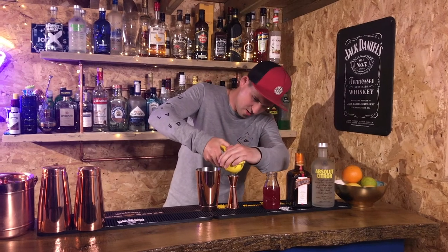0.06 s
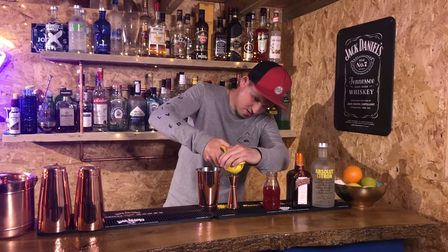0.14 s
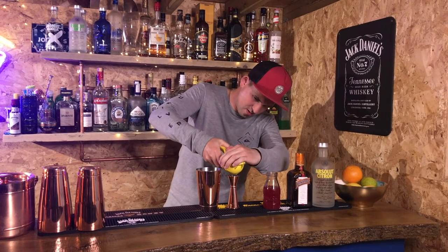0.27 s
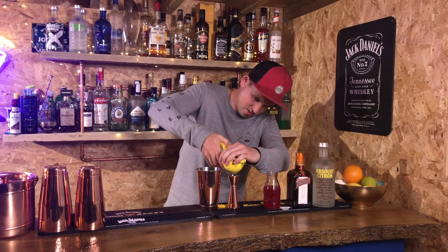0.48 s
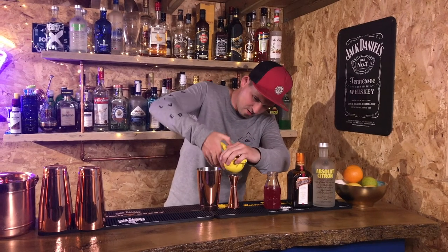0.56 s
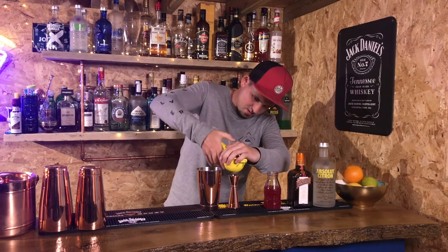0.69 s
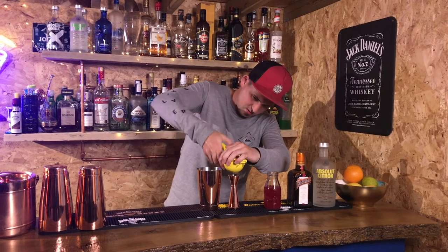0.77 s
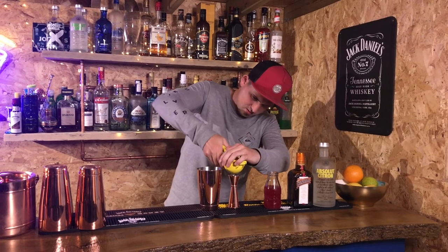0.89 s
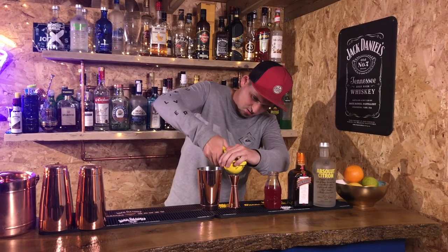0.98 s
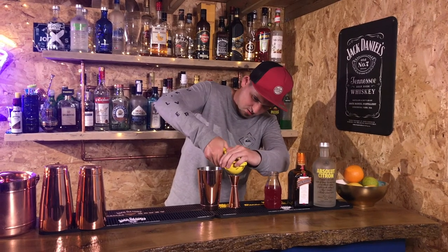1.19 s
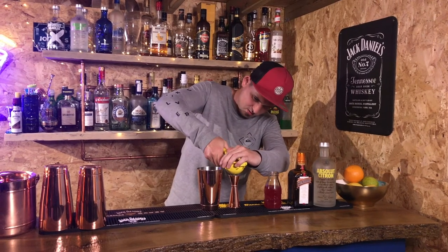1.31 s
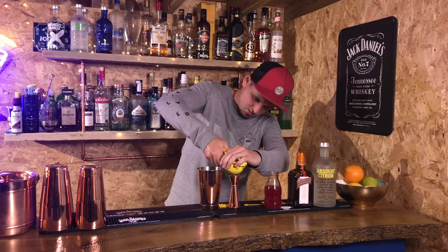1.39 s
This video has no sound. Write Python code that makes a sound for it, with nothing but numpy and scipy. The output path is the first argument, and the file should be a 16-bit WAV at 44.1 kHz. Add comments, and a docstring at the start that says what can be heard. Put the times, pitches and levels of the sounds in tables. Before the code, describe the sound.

A hand citrus press squeezes juice into a metal cup in a small wooden bar. A faint trickle and fizz open; a crisp metallic click cluster comes at 0.21 s, then light drips and a wet spit near 0.37. Sound cuts out from 0.59 to 0.76. Plops and crackling squelches return, with stronger trickling from 1.04, the loudest drop near 1.21, and a dull faint click at 1.43. Low rumble, hum and hiss lie beneath.

```python
"""A hand-held citrus press in a small wooden bar: its metal halves click as cracks of noise over ringing modes.
The rind spits and squelches in puffs of crackling band noise over a fizz. Juice trickles into a metal cup as
random splashes that sound its air column, and drips as damped tones creeping upward. A fridge-like rumble
with a low hum and microphone hiss lies below; the level dips briefly, then the sound is muted for a moment."""
import sys
import numpy as np
from scipy import signal
from scipy.fft import rfft, irfft, next_fast_len
from scipy.io import wavfile
from scipy.ndimage import uniform_filter1d

SR = 44100
rng = np.random.default_rng(int(sys.argv[2]) if len(sys.argv) > 2 else 0)


def wav_out(sig):
    """Save sig, one row per channel (or a flat mono array), as 16-bit PCM at SR to the path in sys.argv[1]."""
    wavfile.write(sys.argv[1], SR, np.round(np.clip(np.atleast_2d(sig).T, -1, 1) * 32767).astype(np.int16))


def invert_db(level):
    """Linear amplitude ratio for a level in decibels (20 dB per decade), elementwise."""
    return 10 ** (np.asarray(level, dtype=float) / 20)


N = 63945
T = np.arange(N) / SR
TOP_HZ = 15750  # highest bubble pitch, and the band limit of the whole mix
FIRST_WALL_S = 0.008  # delay before the room answers


def unit(x):
    """Scale to rms 1."""
    return x / np.sqrt(np.mean(x ** 2) + 1e-20)


def along(points, hz):
    """Read a curve of (Hz, value) points on a log frequency axis."""
    f, value = np.transpose(points)
    return np.interp(np.log(hz + 1), np.log(f + 1), value)


def filtered(x, response):
    """Filter x by a complex response of frequency."""
    size = next_fast_len(len(x) + 8192)
    spectrum = rfft(x, size) * response(np.fft.rfftfreq(size, 1 / SR))
    return irfft(spectrum, size)[:len(x)]


def add(out, start_s, x):
    """Mix x into out from a start time, cutting what runs past the end."""
    part = out[round(start_s * SR):][:len(x)]
    part += x[:len(part)]


RING_WANDER = 0.069  # random walk of a mode's phase [radians a sample]
# Modes the metal press rings with: (frequency [Hz], level [dB], t60 [s])
PRESS_MODES = [(678, -11.5, 0.017), (1170, -23, 0.05), (1192, -3.5, 0.0099), (1350, -5.5, 0.011),
               (2007, -12, 0.035), (2955, -19.5, .02), (3510, -15.5, 0.034), (4076, -6, 0.02),
               (4354, -5.5, 0.022), (4500, -15.5, 0.07), (4560, -19, 0.13), (4633, -17.5, 0.08),
               (4750, -16.5, 0.055), (6630, -16.5, 0.011), (8730, -10, 0.0096)]


def press_ring(t, bright_db):
    """Metal modes die away, each with a wandering phase; brightness lifts those over 3 kHz."""
    ring = np.zeros(len(t))
    for hz, db, t60 in PRESS_MODES:
        level = invert_db(db + bright_db * (hz > 3000) - 60 * t / t60)
        wander = RING_WANDER * np.cumsum(rng.standard_normal(len(t)))
        ring += level * np.sin(2 * np.pi * hz * t + wander)
    return ring


CRACK_DB, CRACK_T60_S, CRACK_TURN_HZ = -0.5, 0.015, 8000  # contact noise against the ring
CLICK_DB, WET_CLICK_DB = -7, -6.5  # trim of all clicks; room tail against the click
LOWEST_HZ = 924  # the small body radiates little below this
# Contacts of the press halves: (time [s], level before the trim [dB], brightness [dB])
CLICKS = [(.2076, -16.5, 1.5), (0.2088, -18.5, 2.5), (0.2122, -23.5, 5.5), (0.2152, -31.5, 9),
          (1.4271, -29, -15), (1.429, -26, -12.5)]


def press():
    """Each contact cracks, rings the press's modes and wakes the room; the small body radiates little bass."""
    out, t = np.zeros(N), T[:SR // 4]
    for start_s, db, bright_db in CLICKS:
        ring = press_ring(t, bright_db)
        noise = filtered(rng.standard_normal(len(t)),
                         lambda f: f / CRACK_TURN_HZ / (1 + (f / CRACK_TURN_HZ) ** 4))
        # brightness counts double in the crack
        crack = noise * invert_db(CRACK_DB + 2 * bright_db - 60 * t / CRACK_T60_S)
        onset = 1 - np.exp(-t / 0.0003)
        hit = invert_db(db + CLICK_DB) * (ring + crack) * onset
        add(out, start_s, hit)
        add(out, start_s + FIRST_WALL_S, invert_db(WET_CLICK_DB) * signal.fftconvolve(hit, tail()))
    return signal.sosfilt(signal.butter(6, LOWEST_HZ, "high", fs=SR, output="sos"), out)


GRAIN_DB, GRAIN_S = 4.5, 0.001  # how unevenly the hiss jumps, and how long a jump is smoothed
# Tiny bubbles: density, cycles until the envelope term exp(-2 cycle / this) has lost two e-folds,
# spread of strength, level over the hiss
BUBBLES_PER_S, BUBBLE_CYCLES, BUBBLE_SPREAD_DB, BUBBLE_DB = 2500, 5, 2, 1


def crackle(size, hz, octaves):
    """Jumpy band noise with tiny bursting bubbles, damped tones of scattered pitch, on it; rms 1."""
    jumps = unit(uniform_filter1d(rng.standard_normal(size), max(1, int(GRAIN_S * SR))))
    grains = rng.standard_normal(size) * invert_db(GRAIN_DB * jumps)
    hiss = unit(filtered(grains, lambda f: np.exp(-0.5 * (np.log2((f + 1) / hz) / octaves) ** 2)))

    when, pitch, strength = rng.standard_normal((3, int(BUBBLES_PER_S * size / SR), 1))
    start = (when * SR * SR % size).astype(int)  # wrapped round, so spread evenly
    lag = np.arange(128)
    bubble_hz = np.minimum(hz * 2 ** (octaves * pitch / np.sqrt(2)), TOP_HZ)
    cycle = lag / SR * bubble_hz
    envelope = cycle * np.exp(-2 * cycle / BUBBLE_CYCLES)
    tones = invert_db(BUBBLE_SPREAD_DB * strength) * envelope * np.sin(2 * np.pi * cycle)
    bubbles = np.bincount((start + lag).ravel(), tones.ravel(), size)[:size]
    return unit(hiss + invert_db(BUBBLE_DB) * unit(bubbles))


FIZZ_HZ, FIZZ_OCTAVES = 6000, 1  # centre and width of the fizz
# Fizz of the pulp under pressure: (time [s], dry rms level [dB])
FIZZ = [(0, -69.5), (.12, -79), (.2, -93), (0.6, -94), (.77, -68.5), (0.949, -73), (1.1, -71.5),
        (1.2, -66.5), (1.301, -71.5), (1.45, -67)]
# Spits of the squeezed rind:
# (crest time [s], dry crest level [dB rms], centre [Hz], width [octaves], rise [s], fall [s])
SPITS = [(.02, -66.5, 13660, 0.6, 0.0031, 0.014), (0.055, -65, 4910, 0.067, 0.0032, 0.011),
         (0.278, -63, 13200, .1, 0.0034, 0.0044), (0.366, -60.5, 8640, 0.083, 0.0015, .003),
         (0.376, -50.5, 6400, 0.33, 0.0045, 0.006), (0.374, -57.5, 12470, 0.17, 0.0047, 0.0057),
         (0.376, -56, 9010, 0.026, 0.0036, 0.015), (.43, -66.5, 5400, 0.14, 0.018, 0.012),
         (0.799, -58.5, 6000, 0.15, 0.013, 0.022), (0.82, -55, 4970, 0.22, 0.0076, 0.013),
         (0.818, -60, 12500, 0.86, 0.014, 0.0096), (0.863, -54, 12200, 0.08, .0008, 0.02),
         (0.863, -53, 15200, 0.054, 0.001, 0.0097), (0.879, -57, 10900, 0.64, 0.002, 0.0025),
         (.884, -55, 14300, 0.13, 0.0037, 0.012), (.9, -66.5, 8900, 0.13, 0.034, 0.01),
         (1.029, -58, 12580, 0.06, 0.0008, 0.0046), (1.035, -60, 9300, 0.94, 0.0067, 0.0098),
         (1.139, -63, 6500, 0.28, 0.002, 0.011), (1.161, -64, 14500, 0.13, 0.0017, 0.0044),
         (1.187, -59.5, 13000, 0.18, 0.0022, 0.0046), (1.198, -57, 12800, 0.26, 0.0027, 0.0047),
         (1.19, -63.5, 9200, 0.036, 0.0063, 0.029), (1.215, -69, 9500, 0.99, 0.011, 0.0114),
         (1.385, -62, 4500, 0.31, 0.0022, 0.0052), (1.418, -71.5, 8760, 0.17, 0.029, 0.009)]


def spits():
    """Pressed rind spits crackling puffs, a rounded rise then a decay, over the fizz of the pulp."""
    s, db = np.transpose(FIZZ)
    out = invert_db(np.interp(T, s, db)) * crackle(N, FIZZ_HZ, FIZZ_OCTAVES)
    for crest_s, db, hz, octaves, rise, fall in SPITS:
        swell = np.exp(-0.5 * ((T - crest_s) / rise) ** 2)
        decay = np.exp(-np.abs(T - crest_s) / fall)
        out += invert_db(db) * np.where(T < crest_s, swell, decay) * crackle(N, hz, octaves)
    return out


# Air column of the cup: (frequency before pitch scaling [Hz], width before scaling [Hz], level [dB])
CUP_MODES = [(1155, 336, 4), (2050, 440, -1.5), (3300, 940, -11), (4500, 420, -15)]


def cup_air(hits, pitch, width):
    """Splashes drive the cup's air modes, each a resonance applied twice; pitch moves the first mode most."""
    def response(f):
        total = 0
        for k, (centre, mode_width, db) in enumerate(CUP_MODES):
            mode_hz = centre * pitch ** (1 / (k + 1) ** 2)
            damping = 1j * f * mode_width * width
            resonance = damping / (mode_hz ** 2 - f * f + damping)
            total = total + (-1) ** k * invert_db(db) * resonance ** 2
        return total
    return unit(filtered(hits, response))


SPLASHES_PER_S, SPLASH_SPREAD_DB = 900, 4
FILLED_S = 0.8  # time the cup takes to fill
# Juice running into the cup: (time [s], dry level [dB])
FLOW = [(0, -62), (0.041, -62), (.1, -62), (.118, -72), (.2, -79), (.4, -78.5), (.56, -87), (0.771, -75),
        (.92, -70.5), (1.0, -70), (1.04, -59), (1.1, -63), (1.14, -58), (1.19, -59), (1.23, -58),
        (1.29, -60), (1.391, -60), (1.41, -82), (1.45, -57)]


def trickle():
    """Dense splashes of uneven size sound the cup's air, which rises and broadens as the cup fills."""
    chance, size = rng.random(N), rng.standard_normal(N)
    sign = rng.choice([-1, 1], N)
    hits = (chance < SPLASHES_PER_S / SR) * invert_db(SPLASH_SPREAD_DB * size) * sign
    empty = cup_air(hits, pitch=0.94, width=0.59)
    full = cup_air(hits, pitch=0.99, width=0.93)
    fill = np.clip(T / FILLED_S, 0, 1) * np.pi / 2
    s, db = np.transpose(FLOW)
    return invert_db(np.interp(T, s, db)) * (np.cos(fill) * empty + np.sin(fill) * full)


DROP_RISE, DROP_ATTACK = 0.028, 0.1  # pitch gain per decay time; attack as a share of the decay time
# Single drops: (time [s], level before the envelope [dB], starting pitch [Hz], decay time [cycles])
DROPS = [(.049, -52, 2033, 10), (.098, -64, 3300, 30), (0.304, -47.5, 2190, 6.6), (.379, -58.5, 2153, 23),
         (.398, -51.5, 1855, 8.5), (0.419, -53, 2225, 6.3), (.475, -63.5, 2050, 15),
         (.797, -54.5, 2444, 20), (0.813, -42.5, 2300, 12), (.822, -48, 1874, 8.7), (.861, -47, 4190, 7.8),
         (.9315, -44, 1094, 2.6), (.9325, -50.5, 660, 1.9), (.935, -51, 2050, 11),
         (0.9321, -50, 5530, 11.5), (0.979, -48.5, 2510, 8.3), (0.979, -49.5, 5620, 12),
         (1.013, -49, 2290, 4.4), (1.037, -41, 1110, 1.1), (1.152, -46, 3750, 14.5),
         (1.183, -41, 2180, 5.2), (1.187, -47, 1132, 4.5), (1.2091, -35.5, 2524, 5), (1.2577, -45, 2220, 7),
         (1.263, -47.5, 1780, 6.7), (1.3086, -53.5, 2150, 20), (1.331, -46, 2430, 5.1),
         (1.385, -46.5, 4240, 3.7)]


def drops():
    """Each drop leaves a bubble: a damped tone creeping upward."""
    out = np.zeros(N)
    for start_s, db, hz, cycles in DROPS:
        age = T[:SR // 20] * hz / cycles  # in decay times
        envelope = np.exp(-age) * (1 - np.exp(-age / DROP_ATTACK))
        phase = 2 * np.pi * cycles * (age + DROP_RISE * age * age / 2)
        add(out, start_s, invert_db(db) * envelope * np.sin(phase))
    return out


FLOOR_DB, HUM_HZ, HUM_DB = -64, 92, -77.5  # rms levels of noise and hum
# Colour of rumble and hiss: (frequency [Hz], relative density [dB per Hz])
FLOOR = [(15, -41.5), (28, -24), (55, -10.5), (85, -7.5), (145, -1.5), (240, -2), (330, -3), (400, -12.5),
         (700, -11), (1300, -16.5), (2500, -19.5), (4000, -26.5), (8000, -26), (15500, -24.5)]


def background():
    """Shaped noise makes rumble and hiss; a band of noise a few hertz wide makes a wavering low hum."""
    noise = unit(filtered(rng.standard_normal(N), lambda f: invert_db(along(FLOOR, f))))
    hum = unit(filtered(rng.standard_normal(N), lambda f: np.exp(-0.5 * ((f - HUM_HZ) / 4) ** 2)))
    return invert_db(FLOOR_DB) * noise + invert_db(HUM_DB) * hum


# Reverberation of the room: (frequency [Hz], t60 [s])
ROOM = [(500, 0.34), (1200, 0.18), (4500, 0.24), (9000, 0.22), (15000, 0.095)]


def tail():
    """One random answer of the room: noise of energy 1 that dies at its own rate in each band."""
    hz, t, z = signal.stft(rng.standard_normal(SR // 2), SR, nperseg=128)
    decay = invert_db(-60 * t / along(ROOM, hz)[:, None])
    x = signal.istft(z * decay, SR, nperseg=128)[1]
    return x / np.linalg.norm(x)


def room(x, wet_db):
    """Dry sound plus the room's tail, drawn anew every tenth of a second."""
    out, step = x.copy(), SR // 10
    for start in range(0, N, step):
        wet = signal.fftconvolve(x[start:start + step], tail())
        add(out, start / SR + FIRST_WALL_S, invert_db(wet_db) * wet)
    return out


def scene():
    """Press and juice in the room, over the background."""
    return (press() + room(trickle() + drops() + spits(), wet_db=-5.5) + background())[None]


def low_pass(x):
    """Steeply removes everything above 16.5 kHz."""
    return signal.sosfilt(signal.butter(12, 16530, fs=SR, output="sos"), x)


# Overall volume, a brief dip, then a fade to silence and back: (time [s], gain [dB])
VOLUME = [(0, 1), (0.175, -3.5), (0.183, -9.5), (0.193, 0.5), (.568, -2.5), (0.571, -10), (.586, -26.5),
          (0.589, -85), (0.759, -90), (0.763, -33.5), (0.771, -4.5), (.78, 0)]


def record(dry):
    """The volume moves, then a steep low-pass limits the band."""
    s, db = np.transpose(VOLUME)
    moved = dry[0] * invert_db(np.interp(T, s, db))
    mix = filtered(moved, lambda f: 1 / np.sqrt(1 + (f / TOP_HZ) ** 400))
    return low_pass(mix[None])


dry = scene()
out = record(dry)
wav_out(out)
```